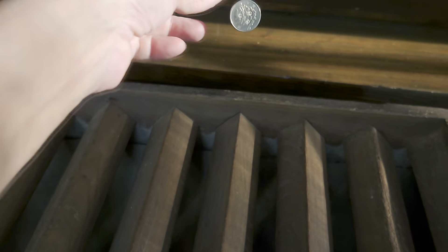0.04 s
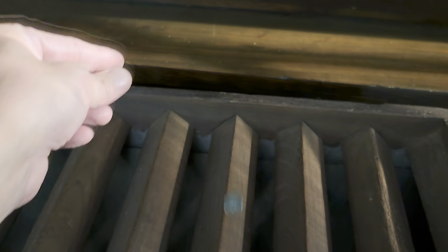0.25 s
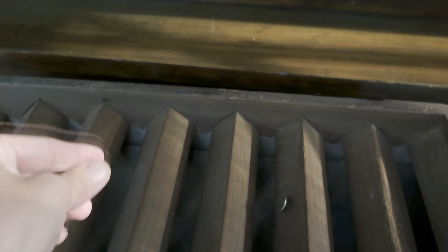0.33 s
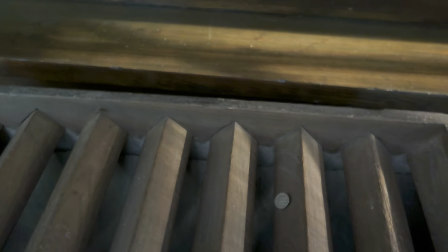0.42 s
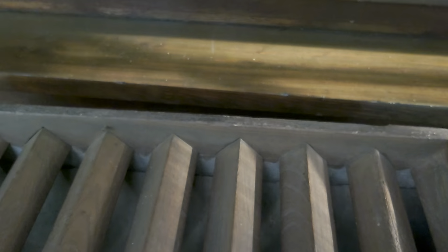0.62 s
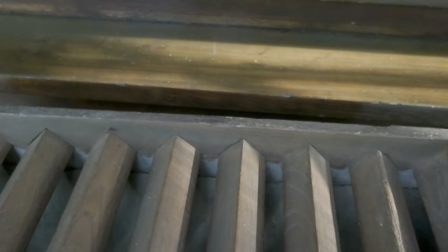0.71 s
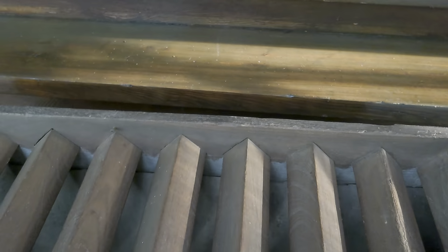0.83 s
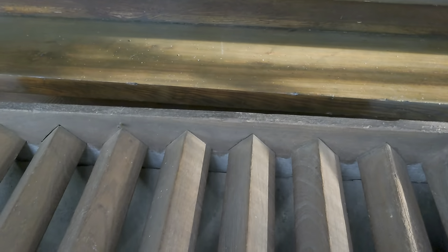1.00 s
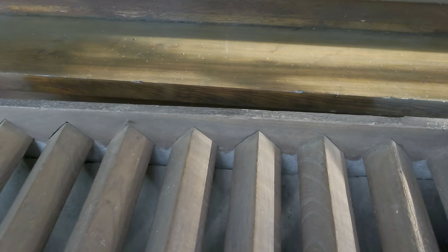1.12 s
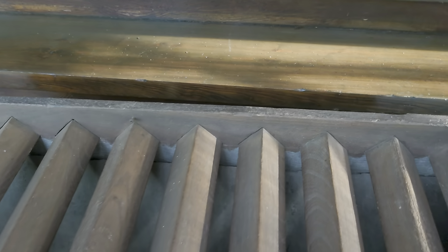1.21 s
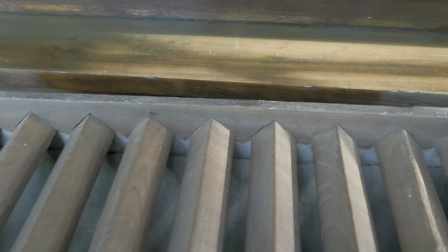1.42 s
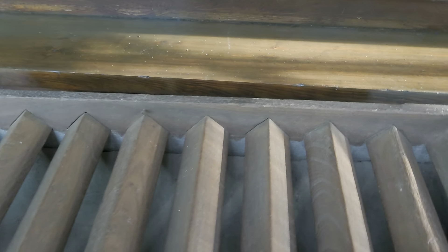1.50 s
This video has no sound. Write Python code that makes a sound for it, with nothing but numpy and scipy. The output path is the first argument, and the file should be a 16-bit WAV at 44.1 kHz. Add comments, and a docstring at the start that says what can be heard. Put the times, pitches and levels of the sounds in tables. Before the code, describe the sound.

A coin hits wooden slats at about 0.2 seconds with sharp, close cracks and a high metallic shimmer, then skitters lightly. From 0.5 to 0.75 seconds it knocks down inside a hollow wooden box, each knock duller. It clacks on the bottom near 0.85 seconds. Loose coins chink and slide around 1.1 and 1.2 seconds, ending with a small scrape near 1.45, over a faint rumble and hiss.

```python
"""Coin into a slatted box

A tossed coin cracks across wooden slats, ringing as it spins, and slips between them.
It knocks down the hollow inside and clacks on the bottom board, where loose coins chink, slide
and settle. Each hit layers a noise burst, ringing modes and a short diffuse tail.
A low rumble and a faint hiss lie underneath."""
import sys
import numpy as np
from scipy import signal
from scipy.fft import rfft, irfft
from scipy.io import wavfile
from scipy.ndimage import uniform_filter1d

SR = 44100
rng = np.random.default_rng(int(sys.argv[2]) if len(sys.argv) > 2 else 0)


def master_out(mix):
    """Clip the mix to full scale and print it as 16-bit PCM to the path in sys.argv[1]."""
    frames = np.transpose(np.atleast_2d(mix))
    ceiling = np.clip(frames, -1, 1)
    pcm = np.round(ceiling * 32767).astype(np.int16)
    wavfile.write(sys.argv[1], SR, pcm)


N = 68355
RING_S, SLIDE_T60_S = .8, 0.24  # length of each one-shot; decay of a slide
RUMBLE_DB, FIZZ_DB, FIZZ_T60_S = -24, -52.5, 0.31
HIGH_CUT_HZ = 15900

# Levels are relative gains; pan is left minus right.
# Bounces on the slats: t/s, wood level/dB, tilt/(dB per octave), snap/dB, coin ring/dB, pan/dB
SLAT_HITS = [(.2260, -4.5, -2.5, -2, -7, 1), (0.2317, -2, 1, -5, -31, -3.5),
             (0.2733, -3, 0.35, -4, -11, -2.5), (0.2827, -9, -5, -1.5, 3, 1.5),
             (0.363, -19.5, -4.5, -40, -23, 2.5), (.385, -19.5, .7, -29, -24, -1),
             (0.3998, -20, -3.5, -28, -14, 2.5), (.435, -20.5, -2.3, -34, -35, -2)]
# Knocks inside the box: t/s, wall level/dB, high cut/Hz, boom/dB, rim click/dB, pan/dB
BOX_HITS = [(.5430, -4, 8100, -4, -13, -1.5), (0.5443, -3.5, 5900, -4, -3.5, -0.5),
            (0.6191, -13, 4960, -6.5, -18, -0.5), (0.6212, -17, 6000, -11, -17, -6.5),
            (0.6747, -12, 4500, -2.5, -37, -1), (0.7339, -9, 1210, 3, -11, -1)]
# Landings on the bottom board: t/s, clack/dB, thud/dB, chink/dB, pan/dB
LANDINGS = [(.857, -9.5, -14, 0, -5.5), (.8628, -0.5, 3, -13, -1), (.921, -23, -14, -11.5, -1.5),
            (1.0745, -17.5, 1.5, -4, -2.5), (1.099, -48, -12, -17, -5), (1.231, -27.5, -6.5, -24, 1),
            (1.249, -33.5, -12.5, -23, 4), (1.4525, -26.5, -23, -35, -2)]
# Loose coins sliding: t/s, swell/s, jingle/dB, board scrape/dB, pan/dB
SLIDES = [(0.855, 0.0017, -20, -19, 4), (1.075, .012, -5, -36, -3), (1.222, 0.022, -1, -37, -3),
          (1.446, 0.022, -27, -1, -4.5)]

# Ringing modes of wood, hollow and metal: f/Hz, level/dB, t60/s
SLAT_MODES = [(339.8, -34.5, 0.46), (362.4, -44, 0.34), (411, -45, .1), (789, -30.5, 0.1), (887, -36, 0.24),
              (1463, -27.5, 0.059), (1844, -25.5, 0.1), (2058, -20.5, 0.042), (2130, -45, 0.028),
              (2863, -17.5, .05), (3797, -25, 0.063), (4130, -12.5, 0.014), (4900, -24, 0.031),
              (5220, -26.5, 0.053)]
WALL_MODES = [(420, -27, 0.27), (1182, -30, 0.21), (1464, -25.5, 0.16), (1990, -29, 0.053),
              (2290, -26, 0.057), (2602, -13, 0.029), (3400, -16.5, 0.046), (3574, -19.5, 0.035),
              (4270, -20, 0.03)]
BOOM_MODES = [(196.6, -36.5, 0.42), (236.6, -32, 0.25), (278.7, -32, 0.32), (344.5, -33.5, 0.079),
              (416.4, -36, 0.23), (447.5, -41.5, 0.43), (592, -28.5, 0.11), (652.4, -40, 0.4),
              (852, -32, 0.16), (1133, -35, 0.16)]
CLACK_MODES = [(1320, -31.5, 0.4), (1565, -30, 0.21), (1776, -18, 0.053), (1955, -19.5, 0.041),
               (2300, -39, 0.025), (3238, -23.5, 0.06)]
THUD_MODES = [(694, -40, 0.2), (779, -24.5, 0.039), (807, -29, 0.066), (843, -31, 0.087)]
COIN_MODES = [(10410, -44, .45), (10479, -40.5, .42), (10855, -47, .55)]
PILE_MODES = [(7607, -45, .15), (10730, -52, .17), (12817, -31, .2), (12930, -37, .17), (13090, -38, .17),
              (13480, -45, .14), (14130, -46, .12)]

# EQ curves that give each noise layer its tone: f/Hz, level/dB
SLAT_EQ = [(100, -16), (250, -2), (370, 11), (550, 6.5), (850, 10.5), (1050, 14), (1400, 11.5),
           (2000, 17.5), (4200, 13), (6000, 4), (7800, -15.5), (13000, -30), (16000, -13)]
SNAP_EQ = [(3000, -25), (6000, 5.5), (8500, -42), (11000, -11), (13000, -8.5), (16000, -23)]  # the metal's own snap
WALL_EQ = [(90, 18), (170, 4), (260, 23), (420, 22), (520, 17.5), (800, 26), (1020, 20), (1220, 21),
           (1470, 21.5), (1720, 22.5), (2000, 20), (2600, 19), (3000, 16), (3450, 15), (4200, 10),
           (5600, -3), (8000, -21.5), (13000, -26.5), (16000, -23)]
RIM_EQ = [(1500, 15), (3500, -11), (6000, -4.5), (8000, -33), (10500, -36), (13000, -15), (16000, -34)]  # the coin's rim on the wall
CLACK_EQ = [(100, 12), (400, 12), (1000, 6.5), (1600, 21), (2100, 14), (2600, 11.5), (3200, 15),
            (4000, 0.5), (6000, -3.5), (9000, -22), (16000, -25)]
THUD_EQ = [(100, -1.5), (500, -18), (800, -19), (1100, 1.5), (2000, -22), (5000, -3), (12000, -50)]
CHINK_EQ = [(1000, 2), (2500, -15), (5000, 1.5), (7700, -7.5), (9000, -13.5), (12000, -6), (12900, 8),
            (14000, -4), (14800, -37), (16000, -23)]
JINGLE_EQ = [(1000, -5), (2500, -10.5), (4500, -0.5), (6500, -6.5), (8500, -21), (10500, -5), (12000, -2.5),
             (13000, -5), (15500, -1.5), (16500, -26)]
SCRAPE_EQ = [(300, -9.5), (800, -10), (1400, -7.5), (1800, 1.5), (2150, 3), (2600, -11.5), (4500, -11),
             (7000, -20.5), (16000, -32)]
RUMBLE_EQ = [(20, 4), (30, 3.5), (50, -2), (74, 3), (105, -13), (140, -18.5), (172, -5), (220, -24.5),
             (500, -23), (1000, -24), (2500, -33), (4500, -38.5), (6500, -41.5), (8500, -60.5),
             (15500, -46.5)]
HISS_EQ = [(500, 6), (1300, -8.5), (2300, -8), (4400, 3), (6200, -9.5), (7500, -43), (16000, -61)]
# Fader ride of the hiss: t/s, level/dB
HISS_RIDE = [(0, -42.5), (.09, -66), (.12, -47.5), (.22, -45.5), (.52, -44), (.8, -41), (1.05, -47),
             (1.2, -47), (1.38, -58), (1.42, -44), (1.55, -59.5)]

# Decay of the box and its surroundings, before stretching: f/Hz, t60/s
TAIL_DECAY = [(100, 0.53), (250, 0.35), (600, 0.3), (1500, 0.38), (4000, 0.15), (8000, 0.33), (15000, 0.17)]
# Stereo image, tight in the bass and wide on top: f/Hz, left-right correlation
CORRELATION = [(30, 0.26), (70, 1), (250, 0.96), (450, 0.63), (700, 0.18), (2000, -0.037), (16000, 0.0083)]
# Where each band of a layer sits: f/Hz, pan/dB
SLAT_PAN = [(200, -4), (380, 1), (700, 3), (1300, -1), (2400, 0.5), (4400, -4), (7000, -17.5), (10500, 2),
            (15000, 14)]
BOX_PAN = [(130, 0.5), (290, 0), (640, 0.5), (1400, -1), (3100, 2.5), (6000, -17.5), (11000, 1)]
RUMBLE_PAN = [(25, -11), (70, -3.5), (150, 3.5), (1000, 0.5), (8000, -9.5)]


def slat_bounces():
    """Sharp, close cracks: each edge of the coin hits the wood in turn, then it skitters."""
    out = np.zeros((2, N))
    for s, db, tilt_db, snap_db, ring_db, pan_db in SLAT_HITS:
        attack = amp(-4.5) * burst(t60=0.0046, rise_s=.0001)
        body = amp(-3.5) * burst(t60=0.037, rise_s=.0005)
        tail = amp(-9) * reverb(rise_s=0.0043, stretch=1.51)
        wood = eq(attack + body + tail, SLAT_EQ, tilt_db) + ring(SLAT_MODES, rise_s=0.00019)
        add(out, s, amp(db) * wood, pan_db)
        snap = eq(burst(t60=0.013, rise_s=.0001), SNAP_EQ)
        add(out, s, amp(snap_db) * snap + amp(ring_db) * coin_ring())
    return pan_bands(out, SLAT_PAN)


def coin_ring():
    """High shimmer: the coin's closely spaced modes beat and waver as it tumbles."""
    tone = ring(COIN_MODES, rise_s=.0005)
    t = one_shot_time()
    rates_hz = rng.uniform(4.6, 47.5, 6)
    tumble = sum(np.sin(2 * np.pi * (hz * t + rng.random((2, 1)))) for hz in rates_hz) / np.sqrt(6)
    return with_reflections(tone * (1 + tumble), wet_db=-2)


def box_knocks():
    """Hollow knocks ring the walls and the air inside, duller as the coin falls deeper."""
    out = np.zeros((2, N))
    for s, db, cut_hz, boom_db, click_db, pan_db in BOX_HITS:
        body = amp(-1) * burst(t60=.038, rise_s=0.00046)
        tail = amp(-4) * reverb(rise_s=0.0037, stretch=1.67)
        wall = eq(body + tail, WALL_EQ) + ring(WALL_MODES, rise_s=0.00026)
        wall = eq(wall, cut_hz=cut_hz)
        click = eq(burst(t60=0.022, rise_s=0.00017), RIM_EQ)
        boom = ring(BOOM_MODES, rise_s=.002)
        add(out, s, amp(db) * wall + amp(boom_db) * boom + amp(click_db) * click, pan_db)
    # The first knock also rings the coin.
    shimmer = amp(-14.5) * coin_ring()
    snap = amp(-18) * eq(burst(t60=0.012, rise_s=.0001), SNAP_EQ)
    add(out, BOX_HITS[0][0], shimmer + snap)
    return pan_bands(out, BOX_PAN)


def landings():
    """The coin clacks and thuds on the bottom board and chinks against loose coins."""
    out = np.zeros((2, N))
    for s, clack_db, thud_db, chink_db, pan_db in LANDINGS:
        wood = burst(t60=0.057, rise_s=0.0015) + amp(-3) * reverb(rise_s=0.0033, stretch=1.69)
        clack = eq(wood, CLACK_EQ) + ring(CLACK_MODES, rise_s=0.0012)
        metal = amp(-1) * burst(t60=0.037, rise_s=0.0013) + reverb(rise_s=0.0025, stretch=1.1)
        pile = with_reflections(ring(PILE_MODES, rise_s=0.0009), wet_db=-3)
        chink = eq(metal, CHINK_EQ) + pile
        thud = ring(THUD_MODES, rise_s=0.0015) + eq(burst(t60=0.018, rise_s=0.0015), THUD_EQ)
        add(out, s, amp(clack_db) * clack + amp(thud_db) * thud + amp(chink_db) * chink, pan_db)
    return out


def coin_slides():
    """Disturbed coins slide over each other and scrape the board, swelling and dying away."""
    out, t = np.zeros((2, N)), one_shot_time()
    for s, swell_s, jingle_db, scrape_db, pan_db in SLIDES:
        envelope = np.minimum(t / swell_s, 1) * decay(np.maximum(t - swell_s, 0), SLIDE_T60_S)
        grain = uniform_filter1d(rng.standard_normal(len(t)), size=130)  # roughens the level
        rub = white_noise(len(t)) * envelope * amp(1.7 * grain / grain.std())
        rub /= np.linalg.norm(rub, axis=1, keepdims=True)
        add(out, s, amp(jingle_db) * eq(rub, JINGLE_EQ) + amp(scrape_db) * eq(rub, SCRAPE_EQ), pan_db)
    return out


def burst(t60, rise_s):
    """The crowded, fast-dying modes of a struck body, played as noise with unit energy."""
    t = one_shot_time()
    hit = white_noise(len(t)) * decay(t, t60) * fade_in(t, rise_s)
    return hit / np.linalg.norm(hit, axis=1, keepdims=True)


def ring(modes, rise_s):
    """Damped modes; the higher ones reach the two ears out of step."""
    t = one_shot_time()
    out = 0
    for hz, db, t60 in modes:
        spread = np.arccos(np.clip(curve(CORRELATION, hz), -1, 1)) / 2 * rng.choice([-1, 1])
        phase = 2 * np.pi * rng.random() + np.array([[spread], [-spread]])
        out = out + amp(db) * decay(t, t60) * np.sin(2 * np.pi * hz * t + phase)
    return out * fade_in(t, rise_s)


def reverb(rise_s, stretch):
    """Diffuse tail of the box and its surroundings; each band dies at its own speed."""
    t = one_shot_time()
    hz, spectrum = noise_spectrum(len(t))
    centres_hz, t60s = np.transpose(TAIL_DECAY)
    out = 0
    for t60, solo in zip(t60s, np.eye(len(t60s))):
        band = curve(np.column_stack([centres_hz, solo]), hz)
        envelope = decay(t, t60 * stretch) * fade_in(t, rise_s)
        out = out + irfft(spectrum * band, len(t)) * envelope / np.linalg.norm(envelope)
    return out


def with_reflections(x, wet_db):
    """Blends a ring with its own reflections, which make it waver."""
    wet = signal.fftconvolve(x, reverb(rise_s=0.0061, stretch=1.0), axes=1)[:, :x.shape[1]]
    wet *= np.linalg.norm(x) / np.linalg.norm(wet)
    return (x + amp(wet_db) * wet) / np.sqrt(1 + amp(wet_db) ** 2)


def background():
    """The bed: steady rumble, a hiss that comes and goes, and a metallic fizz fading at the start."""
    t = np.arange(N) / SR
    hz, spectrum = noise_spectrum(N)
    rumble = amp(RUMBLE_DB) * irfft(spectrum * amp(curve(RUMBLE_EQ, hz)), N)
    hiss = eq(white_noise(N), HISS_EQ) * amp(np.interp(t, *np.transpose(HISS_RIDE)))
    fizz = eq(white_noise(N), JINGLE_EQ) * amp(FIZZ_DB) * decay(t, FIZZ_T60_S)
    fizz *= amp([[3], [-5]])  # sits to the left
    return pan_bands(rumble, RUMBLE_PAN) + hiss + fizz


def noise_spectrum(size):
    """Frequencies and spectrum of stereo white noise, near mono in the bass."""
    hz = np.fft.rfftfreq(size, 1 / SR)
    mid, side = rfft(rng.standard_normal((2, size)))
    correlation = np.clip(curve(CORRELATION, hz), -1, 1)
    mid *= np.sqrt((1 + correlation) / 2)
    side *= np.sqrt((1 - correlation) / 2)
    return hz, np.array([mid + side, mid - side])


def white_noise(size):
    """The stereo noise as a waveform."""
    return irfft(noise_spectrum(size)[1], size)


def eq(x, points=None, tilt_db=0, cut_hz=None):
    """Tone curve, tilt per octave and high cut; minimum phase keeps the attacks crisp."""
    hz = abs(np.fft.fftfreq(4096, 1 / SR))
    db = tilt_db * np.log2((hz + 100) / 2500)
    if points:
        db = db + curve(points, hz)
    if cut_hz:
        db = db - 10 * np.log10(1 + (hz / cut_hz) ** 3)
    response = np.exp(np.conj(signal.hilbert(np.log(amp(db)))))
    taps = np.fft.ifft(response).real
    return signal.fftconvolve(x, taps[None, :len(taps) // 2], axes=1)[:, :x.shape[1]]


def pan_bands(x, points):
    """Pans each frequency to its own place."""
    db = curve(points, np.fft.rfftfreq(2 * N, 1 / SR))
    return irfft(rfft(x, 2 * N) * amp([db / 2, -db / 2]), 2 * N)[:, :N]


def add(mix, s, sound, pan_db=0):
    """Drops a stereo sound into the mix at s seconds, panned."""
    part = mix[:, round(s * SR):][:, :sound.shape[1]]
    part += sound[:, :part.shape[1]] * amp([[pan_db / 2], [-pan_db / 2]])


def curve(points, hz):
    """Reads a table on a logarithmic frequency axis."""
    f, value = np.transpose(points)
    return np.interp(np.log(hz + 1), np.log(f + 1), value)


def one_shot_time():
    """Time axis of one hit, in seconds."""
    return np.arange(int(RING_S * SR)) / SR


def fade_in(t, rise_s):
    """Exponential attack."""
    return 1 - np.exp(-t / rise_s)


def decay(t, t60):
    """Falls 60 dB in t60 seconds."""
    return np.exp(-np.log(1000) * t / t60)


def amp(db):
    """Decibels to gain."""
    return 10 ** (np.asarray(db) / 20)


def scene():
    """The whole fall over the bed."""
    return slat_bounces() + box_knocks() + landings() + coin_slides() + background()


def record(dry):
    """A steep high cut on the mix."""
    taps = signal.firwin(511, HIGH_CUT_HZ, window=("kaiser", 9), fs=SR)
    return signal.oaconvolve(dry, taps[None], "same")


dry = scene()
out = record(dry)
master_out(out)
```